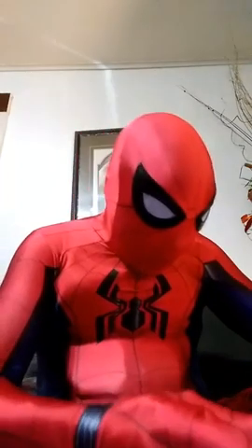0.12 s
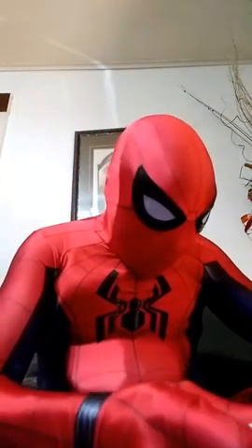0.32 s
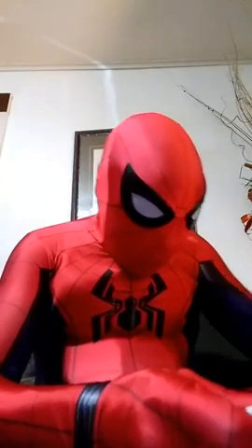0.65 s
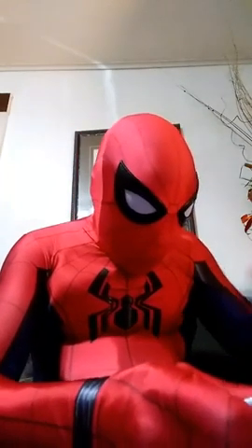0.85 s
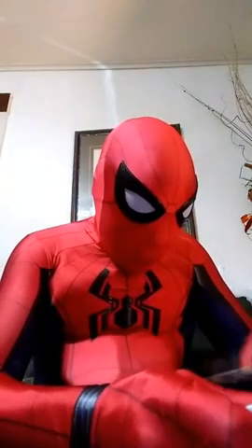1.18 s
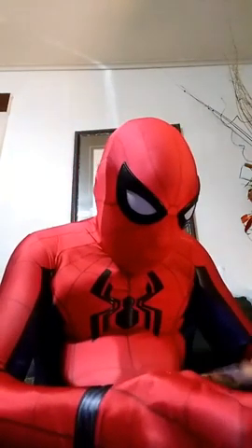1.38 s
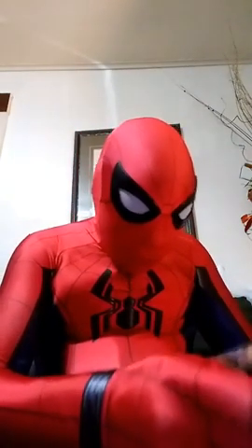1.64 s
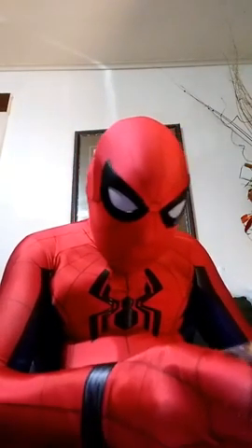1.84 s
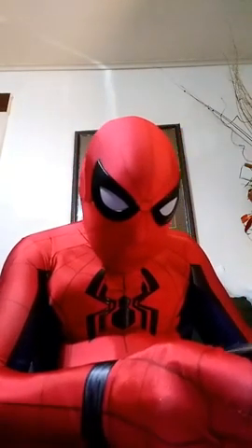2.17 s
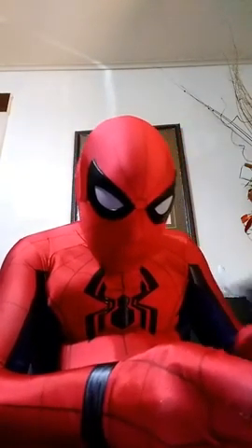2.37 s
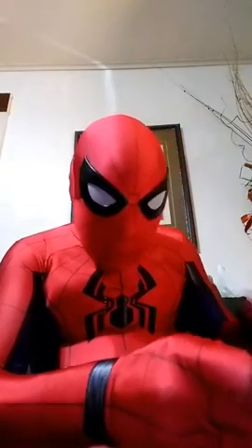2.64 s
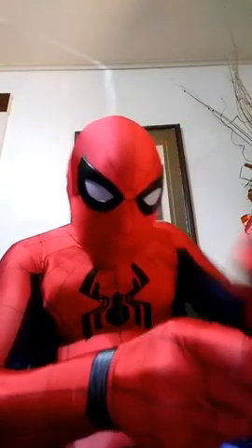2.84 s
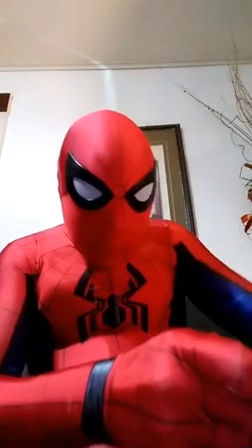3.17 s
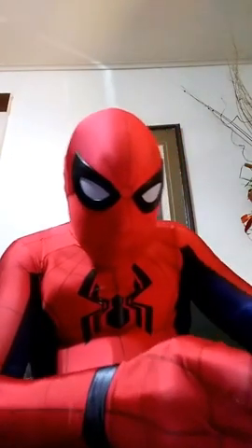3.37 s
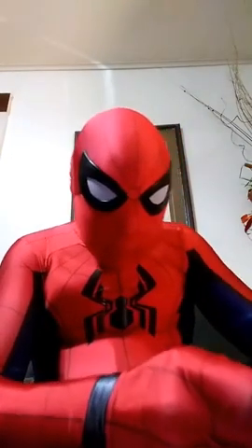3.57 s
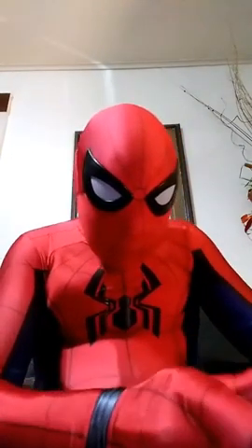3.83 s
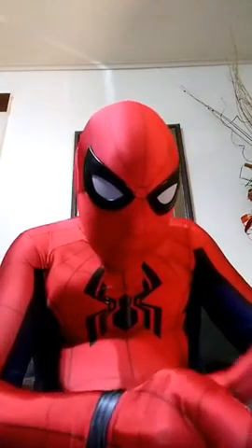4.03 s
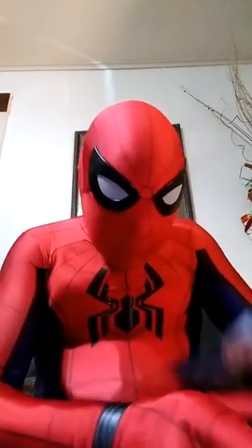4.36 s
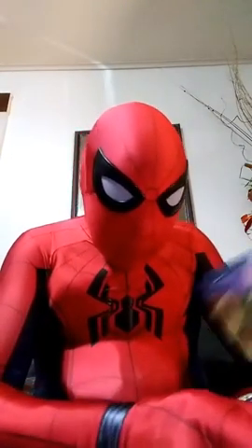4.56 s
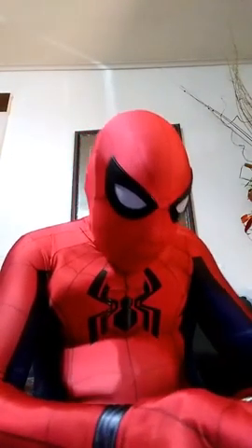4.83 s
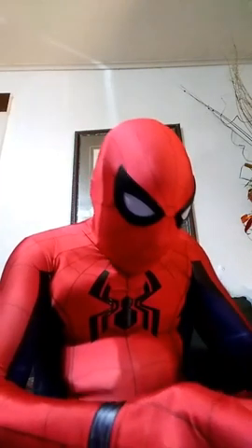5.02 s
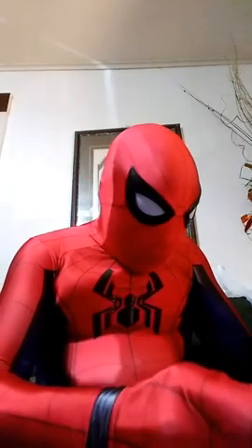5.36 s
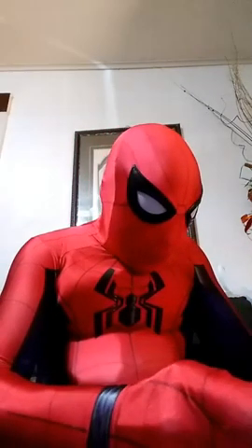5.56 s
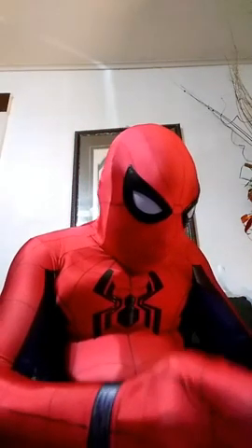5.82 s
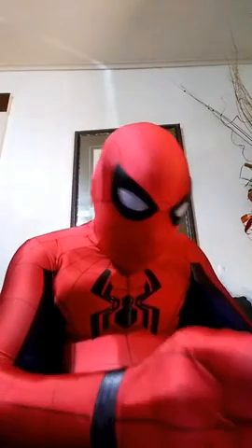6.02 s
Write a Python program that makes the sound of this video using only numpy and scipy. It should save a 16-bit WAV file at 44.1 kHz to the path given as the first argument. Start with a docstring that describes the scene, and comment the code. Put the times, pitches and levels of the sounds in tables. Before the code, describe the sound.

Book pages are handled close to a mono microphone in a small room with a faint hush. Soft rustles and little ticks open, then a page edge scrapes at about 0.4 seconds. A louder scrape with paper slaps and hollow bumps comes between 0.7 and 0.9 seconds. Faint rubbing and light taps follow, until another scrape runs from 2.1 to 2.4 seconds, with a small click just after. At 3.3 seconds the paper snaps sharply, the crispest sound, together with a bump of the book. Busier rustling and flicking continue until about 4.8 seconds, strongest just after 4, with a hollow knock near 4.3. A lull holds only faint finger movements and tiny ticks. From about 5.6 seconds a whole sheet glides over the next with a soft swish, ending in a brief rustle around 6 seconds.

```python
"""First comes the soft rustle of book pages, handled and turned close to a mono microphone.
Sheet rubs on sheet by stick-slip friction, and a bent edge scrapes in a band that falls as it unbends.
Now and then the paper snaps or slaps, and the hand bumps the book on its hollow support.
Near the end a whole sheet glides over the next. A small, quiet room adds reflections and a faint hush."""
import sys
import numpy as np
from scipy import signal
from scipy.fft import rfft, irfft, next_fast_len
from scipy.io import wavfile
from scipy.ndimage import uniform_filter1d

SR = 44100
rng = np.random.default_rng(int(sys.argv[2]) if len(sys.argv) > 2 else 0)


def persist_wave(psi):
    """Save psi, clipped to +-1, as 16-bit WAV."""
    counts = np.round(np.clip(psi, -1, 1) * 32767).astype(np.int16)
    wavfile.write(sys.argv[1], SR, np.atleast_2d(counts).T)


N = 272449

# Strokes: sheet on sheet, a page edge, one smooth glide. Each row: start, attack, hold and release
# in seconds, rasp level in dB, fizz and murmur of the book in dB relative to the rasp.
RUBS = [ (.02, .01, .004, .05, -48, -7, -3), (.1, .012, .066, .016, -53, -3, 0),
        (.19, .012, .045, .014, -55.5, -7, .5), (.25, .014, .138, .036, -42.8, -6, -8.5),
        (.652, .005, .026, .01, -52, -4, 4), (.684, .016, .036, .014, -35.3, -14.5, -5.5),
        (.742, .005, .025, .075, -45.5, -15, 4), (.915, .03, .07, .04, -53, -7.5, 7.5),
        (1.078, .034, .024, .06, -50.5, -9, 4), (1.145, .012, .05, .02, -55.5, -6, 0),
        (1.21, .014, .036, .034, -57.5, -4, 10), (1.48, .06, .02, .028, -61, -9, -7),
        (1.592, .016, .022, .095, -45.2, -10, -5), (1.707, .02, .012, .018, -56, -7.5, 0),
        (1.86, .034, .018, .073, -51.5, -7, 7.5), (2.008, .034, .045, .02, -58.5, -4.5, 2.5),
        (2.553, .012, .06, .02, -54.5, -9, 1), (2.72, .042, .005, .012, -57.5, -8, -1),
        (2.853, .052, .022, .042, -52.5, -8.5, -3), (3.026, .017, .005, .016, -53.5, -7, -1),
        (3.152, .022, .005, .017, -56.5, -6, 1), (3.33, .005, .02, .07, -45, -10, -9),
        (3.388, .052, .06, .055, -40.5, -6.5, -7.5), (3.535, .025, .06, .016, -50.5, -5, -2.5),
        (3.615, .018, .262, .08, -44.7, -8, -4.3), (3.932, .02, .08, .03, -41, -7.5, -8),
        (4.028, .051, .006, .008, -28.5, -6.5, -10), (4.085, .005, .035, .065, -38, -8, -8),
        (4.17, .028, .027, .014, -40.5, -10, -8), (4.22, .015, .095, .014, -46.8, -9, -.5),
        (4.322, .022, .028, .026, -36.5, -9, -7), (4.385, .018, .015, .045, -36, -9, -13),
        (4.43, .025, .06, .068, -42.7, -7, -7), (4.572, .012, .15, .056, -44.4, -7, -4.5),
        (4.918, .034, .018, .02, -53, -12, -1), (5.475, .04, .05, .01, -75.5, 5, -4),
        (5.572, .02, .055, .04, -52, 0, -8), (5.89, .03, .07, .026, -52, -8, 0),
        (6.028, .03, .04, .03, -62.5, -5.5, -4.5), (6.126, .022, .018, .04, -47, -11, -2), ]
SCRAPES = [(.425, .012, .21, .07, -38.3, -16, -15), (.818, .025, .015, .084, -24.8, -38, -9),
           (2.066, .04, .1, .05, -37.8, -19, -6.5), (2.208, .035, .11, .08, -37.8, -23, -4)]
GLIDE = (5.62, .135, .11, .085, -42.5, -1.2, -7)
# The band of a bending edge. Each row: time in seconds, lower and upper limit in Hz, tautness from 0 to 1.
EDGE_BAND = [ (.43, 2400, 4300, .2), (.47, 2600, 3900, .45), (.494, 2600, 3380, .7), (.52, 1600, 2700, .15),
             (.59, 1900, 3400, .5), (.66, 1400, 3270, .1), (.82, 1150, 2000, .3), (.855, 1100, 1850, .06),
             (.95, 900, 1870, 0), (2.09, 1260, 3270, .12), (2.19, 1230, 4600, .4), (2.24, 1300, 4850, .7),
             (2.28, 2100, 4550, .95), (2.32, 1190, 4450, .8), (2.43, 1100, 4300, .9), ]
# Snaps and slaps of paper. Each row: start in seconds, level in dB, centre in Hz, width in octaves,
# time to decay by 60 dB in seconds.
SNAPS = [ (.032, -30, 2670, 1, .027), (.106, -41.5, 2000, 1.6, .05), (.2077, -20.5, 5200, .6, .0057),
         (.258, -31, 3200, .12, .047), (.388, -29, 3200, .6, .04), (.433, -27, 3300, .29, .073),
         (.618, -27, 4660, .4, .015), (.691, -22, 1600, 1.1, .09), (.824, -19, 1500, .45, .07),
         (.841, -18, 1610, .55, .03), (.852, -15.5, 1400, .54, .024), (.873, -21.5, 1500, .55, .06),
         (1.105, -30.5, 1100, .47, .031), (1.221, -33, 1000, 1.2, .024), (1.891, -31, 830, .4, .13),
         (1.942, -31.5, 1500, 1.6, .019), (2.093, -31, 1900, .53, .047), (2.131, -23.5, 2500, .84, .02),
         (2.187, -28, 1490, .28, .1), (2.282, -25, 3330, .12, .041), (2.565, -22, 5000, .54, .0068),
         (2.565, -33, 1900, .16, .084), (3.172, -37, 1900, .89, .026), (3.281, -43, 1000, 1.7, .13),
         (3.304, -31, 2500, 3, .045), (3.3085, -8.5, 3000, 1.15, .026), (3.3092, -20, 190, .7, .06),
         (3.3131, -21, 1950, .4, .12), (3.3224, -15.5, 3900, 1.5, .033), (3.3295, -21.5, 1900, 1.06, .048),
         (3.953, -25, 3800, 1.5, .013), (4.083, -16, 2400, .86, .02), (4.3425, -19, 3000, .79, .022),
         (4.359, -26, 2600, .7, .083), (4.515, -27, 2500, 1.04, .029), (4.585, -31, 1700, .4, .06),
         (4.673, -25.5, 2010, 1.2, .027), (4.833, -47, 2500, 1.3, .035), (5.021, -43, 1600, 1.7, .027),
         (5.127, -43.5, 1380, 1.7, .029), (5.28, -41.5, 1920, 1.7, .019), (5.315, -41, 1880, 1.5, .028), ]
# Blows on the book. Each row: start in seconds, ring and thud in dB, frequency the spot favours in Hz.
BUMPS = [ (.647, -48, -27, 400), (.691, -22, -36, 700), (.779, -27.5, -40, 645), (.853, -13.5, -37, 570),
         (.876, -13, -31, 600), (1.104, -28, -37.5, 560), (1.22, -30, -40, 600), (1.89, -28, -46, 640),
         (1.901, -30, -41, 560), (2.106, -23.5, -41, 670), (2.127, -20, -48, 670), (2.318, -21, -48, 577),
         (2.559, -30.5, -36.5, 510), (2.758, -37, -56, 560), (3.14, -37, -66, 520), (3.171, -33, -48, 540),
         (3.31, -17.5, -24, 650), (3.325, -22, -34, 680), (3.463, -26, -44, 620), (3.68, -38, -38, 554),
         (4.088, -44, -33, 500), (4.166, -37, -28.5, 360), (4.2745, -13, -26, 625), (4.68, -29, -37, 500),
         (5.128, -45, -54, 574), (5.28, -46, -55.5, 607), ]
# Spells of creeping fingers. Each row: start in seconds, length in seconds, level in dB.
FIDGETS = [(0, .12, -68), (1.38, 1.21, -68.5), (2.63, .31, -62), (2.95, .36, -70), (4.78, .58, -69.5),
           (5.41, .21, -71.5)]
# Spectra of a rubbed sheet, a gliding sheet, the fibres, the book beneath, the fingers and the background.
# Each row: frequency in Hz, relative level in dB.
RASP_SPECTRUM = [(500, -20.5), (950, -10.5), (1250, -5), (1650, -2), (2400, 2), (3300, -2), (4200, -6.5),
                 (5500, -24.5), (9000, -38)]
SWISH_SPECTRUM = [(450, -20), (620, -6.5), (950, -10), (1300, -3.5), (2000, 3), (2500, 1), (3700, 5.5),
                  (4700, 1), (6000, -5.5), (9000, -31)]
FIZZ_SPECTRUM = [(2500, -20.5), (4300, -3), (5300, -3), (6700, -3), (8000, -9), (9200, -9.5), (10300, -15),
                 (14000, -19)]
MURMUR_SPECTRUM = [(25, -19.5), (45, 4.5), (65, 6), (110, 1), (170, 1), (300, 0.5), (450, -3), (650, -4),
                   (850, -14), (1200, -11.5), (2500, -35.5)]
FINGER_SPECTRUM = [(60, 5), (520, -3), (1000, -7), (2000, -3), (3200, -4.5), (7000, -13.5), (14000, -15)]
HUSH_SPECTRUM = [(18, -36), (30, -11), (177, 2.5), (311, -6.5), (674, -18), (917, -21), (2090, -12.5),
                 (3400, -21.5), (4070, -13.5), (5550, -18.5), (14000, -24.5)]
# Peaks and dips in the response of book and support. Each row: centre in Hz, width in Hz, gain in dB.
BODY_RESONANCES = [(625, 180, 10.5), (880, 170, -3), (1430, 760, 4.5), (1998, 270, 3.2), (2440, 220, -4),
                   (3063, 300, 2.5)]
# Modes of the support. Each row: frequency in Hz, relative level in dB, time to decay by 60 dB in seconds.
SUPPORT_MODES = [(361, 4, .05), (523, -6, .07), (621, 1.5, .04), (680, -2.5, .055)]
# Decay of the room. Each row: frequency in Hz, reverberation time in seconds.
ROOM_DECAY = [(100, 0.63), (600, 0.21), (2000, .27), (6000, .18), (14000, 0.24)]

FRAMES = dict(fs=SR, nperseg=512, noverlap=384)  # for filters that change over time


def stroke(row, rasp, touch_db, fizz_follow=.8, murmur_follow=.7, sag_db_per_s=4, fade_s=.005,
           lumps_db=4.0, uneven_db=1):
    """Sliding friction: the same slips drive rasp, fizz and the book's murmur, all rising with pressure."""
    start, attack, hold, release, rasp_db, fizz_db, murmur_db = row
    corners = start + np.cumsum([0, attack, hold, release])
    t = np.arange(start, corners[-1], 1 / SR)
    # The hand starts at a light touch, presses, eases off as it holds, and lets go.
    pressure_db = np.interp(t, corners, [touch_db, 0, -sag_db_per_s * hold, touch_db])
    pressure_db += uneven_db * wander(len(t), hz=60)
    drive = slips(len(t))
    murmur = unit(colour(drive, MURMUR_SPECTRUM) * amp(lumps_db * wander(len(t), hz=70.9)))
    sound = amp(pressure_db) * rasp(drive, t) + amp(murmur_db + murmur_follow * pressure_db) * murmur
    sound = amp(rasp_db) * sound + fizz(drive, rasp_db + fizz_db + fizz_follow * pressure_db)
    contact = np.clip(np.minimum(t - t[0], t[-1] - t) / fade_s, 0, 1)
    return start, sound * np.sin(np.pi / 2 * contact)


def slips(count, per_s=2600, spread_db=2.5, grain=.65, flutter_db=.5, flutter_hz=220, clump_db=.7):
    """Stick-slip motion: fibres catch and let go in a haze of tiny slips and some larger ones, in clumps."""
    sizes = amp(spread_db * np.minimum(rng.exponential(1, count), 3)) * rng.choice([-1, 1], count)
    large = unit(sizes * (rng.random(count) < per_s / SR))
    grip = amp(flutter_db * wander(count, flutter_hz) + clump_db * wander(count, hz=55))
    return (rng.standard_normal(count) + grain * large) * grip


def sheet_rasp(drive, t, bend_db=3.5, patch_bins=9, patch_frames=19):
    """Shifting resonances: a loose sheet rasps over a wide band whose peaks come and go as it bends."""
    spectra = signal.stft(drive, **FRAMES)[2]
    patches = uniform_filter1d(rng.standard_normal(spectra.shape), patch_bins, axis=0)
    patches = uniform_filter1d(patches, patch_frames, axis=1)
    bent = signal.istft(spectra * amp(bend_db * unit(patches)), **FRAMES)[1]
    return colour(bent[:len(t)], RASP_SPECTRUM)


def edge_rasp(drive, t, low_slope=4.5, slack_slope=7.4, taut_slope=40.0, skirt_db=-27,
              sing_db=9.5, sing_width=.012):
    """Band-pass filtering: an edge's band moves with its bend; taut, it ends sharply and two modes sing."""
    _, frame_s, spectra = signal.stft(drive, **FRAMES)
    hz = np.fft.rfftfreq(FRAMES["nperseg"], 1 / SR)[:, None] + 1
    times, *columns = np.transpose(EDGE_BAND)
    low, high, taut = (np.interp(t[0] + frame_s, times, column) for column in columns)
    low_pass = 1 / np.sqrt(1 + (hz / high) ** (slack_slope + taut * taut_slope))
    high_pass = 1 / np.sqrt(1 + (low / hz) ** low_slope)
    skirt = amp(skirt_db) / (1 + (hz / (2 * high)) ** 8)
    sing = sum(1 / (1 + ((hz / (ratio * high) - 1) / sing_width) ** 2) for ratio in (.74, .97))
    band = (low_pass + skirt) * high_pass * amp(body_db(hz) + sing_db * taut * sing)
    spectra = spectra * band / np.linalg.norm(band, axis=0)
    return unit(signal.istft(spectra, **FRAMES)[1][:len(t)])


def glide_rasp(drive, t):
    """Friction noise: a smoothly gliding sheet swishes higher than a rubbed one."""
    return colour(drive, SWISH_SPECTRUM)


def fizz(drive, db, dull_hz=7500, dull_from_db=-47, dull_span_db=7):
    """Fibre friction: a fizz lies above the rasp and loses its top when the fibres are pressed hard."""
    bright = colour(drive, FIZZ_SPECTRUM)
    dull = signal.sosfiltfilt(signal.butter(3, dull_hz, fs=SR, output="sos"), bright)
    dull_share = np.clip((db - dull_from_db) / dull_span_db, 0, .85)
    return amp(db) * (bright + dull_share * (dull - bright))


def snap(db, centre_hz, octaves, t60, trim_db=-6, skirt_db=-33, top_hz=8500):
    """Buckling and impact: a sheet gives a burst of slips, more sudden the harder it is forced."""
    t = np.arange(SR // 4) / SR
    hz = np.fft.rfftfreq(len(t), 1 / SR) + 1
    peak = np.exp(-.5 * (np.log2(hz / centre_hz) / octaves) ** 2)
    band = (amp(skirt_db) + peak) / (1 + (hz / top_hz) ** 4)
    response = irfft(unit(band * amp(body_db(hz))), len(t))
    # Minimum phase: the sheet can ring only after it is hit.
    log_gain = np.log(abs(np.fft.fft(response)) + 1e-6)
    ring = np.fft.ifft(np.exp(np.conj(signal.hilbert(log_gain)))).real
    rise_s = .0001 / amp(.54 * db)
    force = amp(-60 * t / t60) * (1 - np.exp(-t / rise_s))
    return amp(db + trim_db) * signal.fftconvolve(force * rng.standard_normal(len(t)), ring)[:len(t)]


def bump(ring_db, thud_db, spot_hz, reach_hz=100, rise_s=.0028, thud_hz=105, thud_t60=.053, puff_s=.0028):
    """Modal excitation: a soft blow rings the hollow support, thuds in the pages and expels a puff of air."""
    t = np.arange(SR // 4) / SR
    ring = np.zeros(len(t))
    for hz, db, t60 in SUPPORT_MODES:
        mode = amp(db - 60 * t / t60) * np.sin(2 * np.pi * hz * rng.uniform(.975, 1.015) * t)
        ring += mode / (1 + ((hz - spot_hz) / reach_hz) ** 2)
    thud_band = signal.butter(2, [thud_hz / 2, thud_hz * 2], "band", fs=SR, output="sos")
    pages = unit(signal.sosfilt(thud_band, rng.standard_normal(len(t))))
    puff_time = t / puff_s - 2.5
    puff = (1 - 2 * puff_time ** 2) * np.exp(-puff_time ** 2)
    thud = .5 * amp(-60 * t / thud_t60) * pages + .67 * puff
    onset = 1 - np.exp(-(t / rise_s) ** 2)
    return (.84 * amp(ring_db) * ring + amp(thud_db) * thud) * onset


def fidget(length, db, fade_s=.03):
    """Frictional creep: the fingers inch over the sheet in faint, uneven slips."""
    t = np.arange(0, length, 1 / SR)
    drive = slips(len(t), per_s=420, spread_db=3.5, grain=.4, flutter_db=2.5, flutter_hz=120.4, clump_db=3.2)
    fade = np.minimum(np.minimum(t, length - t) / fade_s, 1)
    return amp(db) * colour(drive, FINGER_SPECTRUM) * fade


def body_db(hz):
    """Resonance: book and support raise some frequencies and lower others, by this many dB."""
    return sum(db / (1 + (2 * (hz - centre) / width) ** 2) for centre, width, db in BODY_RESONANCES)


def colour(drive, spectrum):
    """Source and filter: a spectrum and the book's resonances shape the drive, returned at unit rms."""
    size = next_fast_len(len(drive) + 2048)
    hz = np.fft.rfftfreq(size, 1 / SR)
    gain = amp(curve_at(spectrum, hz) + body_db(hz))
    return unit(irfft(rfft(drive, size) * gain, size)[:len(drive)])


def room(direct, early_db=-11, early_t60=.037, tail_db=-19, lowest_hz=350):
    """Reflection: small surfaces nearby return all but the bass; the furnished room adds a short tail."""
    t = np.arange(SR // 2) / SR
    early = rng.standard_normal(len(t)) * (rng.random(len(t)) < .03)
    early *= amp(-60 * t / early_t60) * (t > .001)
    early = signal.sosfilt(signal.butter(2, lowest_hz, "high", fs=SR, output="sos"), early)
    hz, frame_s, spectra = signal.stft(rng.standard_normal(len(t)) * (t > .006), SR, nperseg=256)
    decay = amp(-60 * frame_s / curve_at(ROOM_DECAY, hz)[:, None])
    tail = signal.istft(spectra * decay, SR)[1][:len(t)]
    echo = amp(early_db) * early / np.linalg.norm(early) + amp(tail_db) * tail / np.linalg.norm(tail)
    return direct + signal.oaconvolve(direct, echo)[:N]


def hush(db=-74.5):
    """Stationary noise: a faint, steady hush lies under everything."""
    return amp(db) * colour(rng.standard_normal(N), HUSH_SPECTRUM)


def amp(db):
    """Decibels as an amplitude ratio."""
    return 10 ** (np.asarray(db) / 20)


def unit(x):
    """Normalisation to an rms of one."""
    return x / np.sqrt(np.mean(x ** 2) + 1e-20)


def curve_at(points, hz):
    """Interpolation on a logarithmic frequency axis."""
    point_hz, values = np.transpose(points)
    return np.interp(np.log(hz + 1), np.log(point_hz + 1), values)


def wander(count, hz):
    """Random modulation: a line through hz chance values a second."""
    return np.interp(np.arange(count) * hz / SR, np.arange(count), rng.standard_normal(count))


def add(mix, start, sound):
    """Superposition: a sound joins the mix at its start in seconds."""
    part = mix[max(round(start * SR), 0):][:len(sound)]
    part += sound[:len(part)]


def scene():
    """Superposition: all handling of the book sums in the room, over the hush, alike in both channels."""
    book = np.zeros(N)
    for row in RUBS:
        add(book, *stroke(row, sheet_rasp, touch_db=-14))
    for row in SCRAPES:
        add(book, *stroke(row, edge_rasp, touch_db=-25))
    add(book, *stroke(GLIDE, glide_rasp, touch_db=-14, fizz_follow=1.45, fade_s=.012,
                      lumps_db=1.7, uneven_db=.4))
    for start, length, db in FIDGETS:
        add(book, start, fidget(length, db))
    for start, *shape in SNAPS:
        add(book, start, snap(*shape))
    for start, *blow in BUMPS:
        add(book, start, bump(*blow))
    mono = room(book) + hush()
    return np.array([mono, mono])


def record(dry, low_cut_hz=42, high_cut_hz=14400):
    """Band limiting: the microphone sheds deep bass, and a steep filter removes the highest treble."""
    thin = signal.sosfilt(signal.butter(3, low_cut_hz, "high", fs=SR, output="sos"), dry)
    low_pass = signal.firwin(511, high_cut_hz, window=("kaiser", 8), fs=SR)
    return signal.oaconvolve(thin, low_pass[None], "same")


dry = scene()
out = record(dry)
persist_wave(out)
```